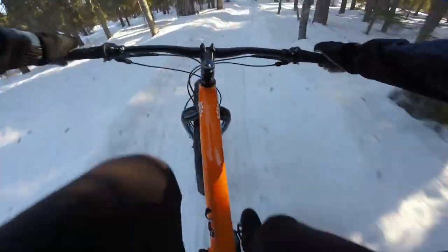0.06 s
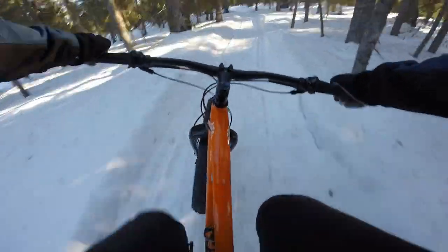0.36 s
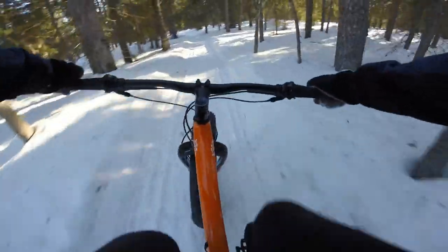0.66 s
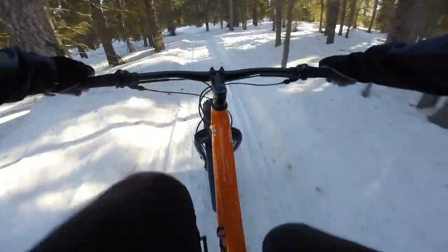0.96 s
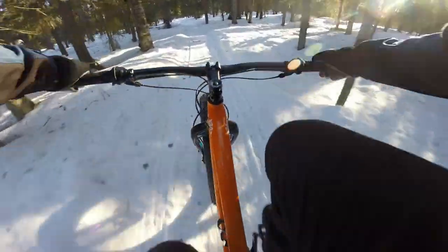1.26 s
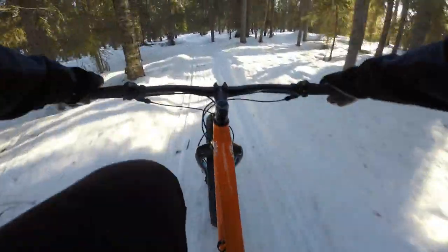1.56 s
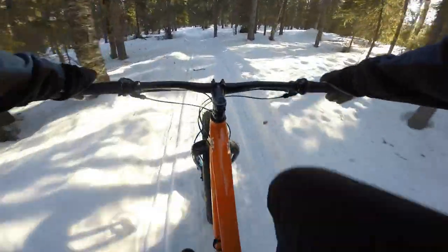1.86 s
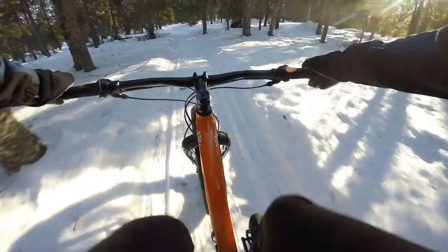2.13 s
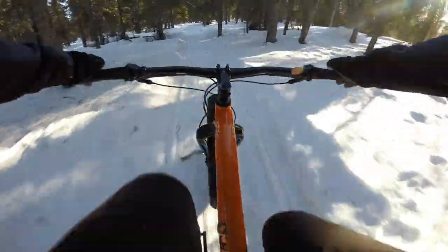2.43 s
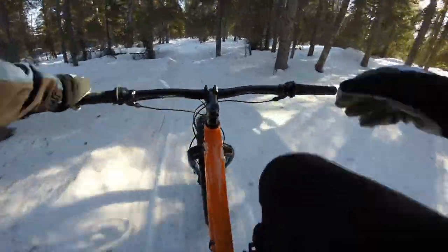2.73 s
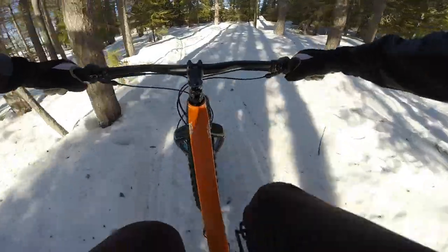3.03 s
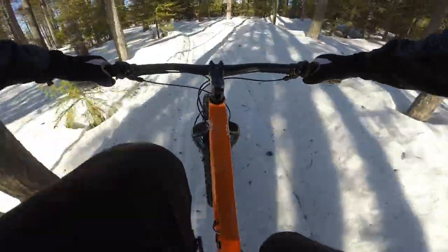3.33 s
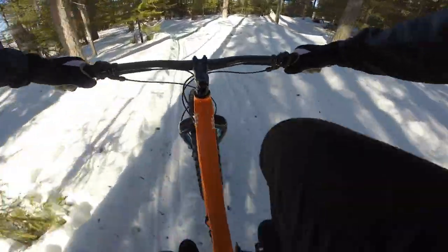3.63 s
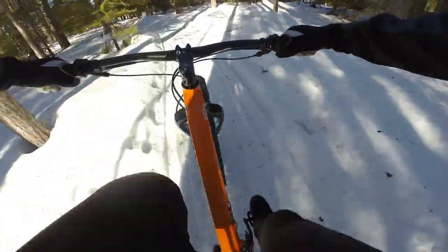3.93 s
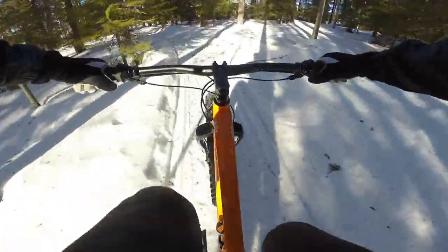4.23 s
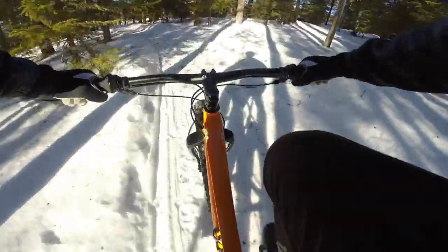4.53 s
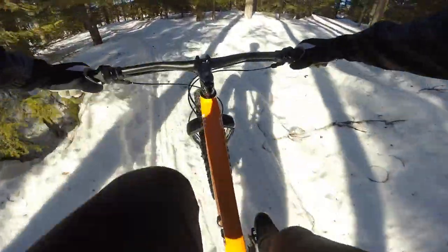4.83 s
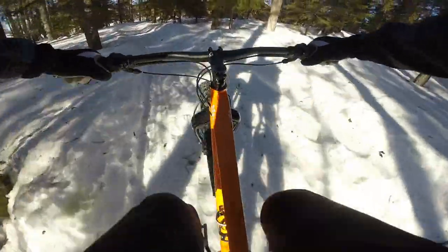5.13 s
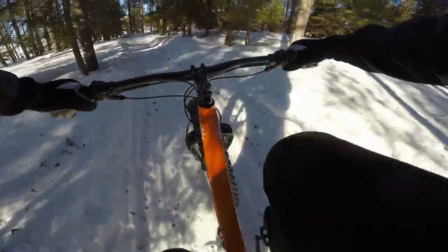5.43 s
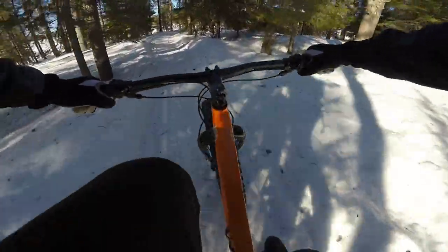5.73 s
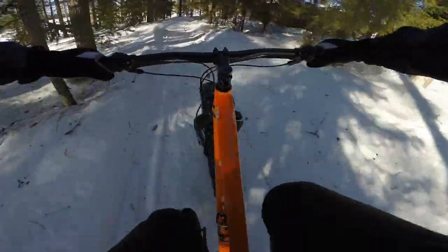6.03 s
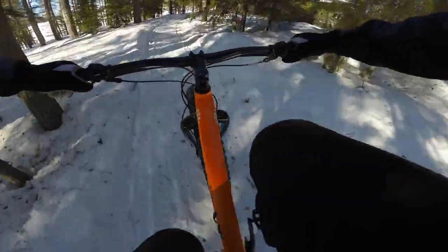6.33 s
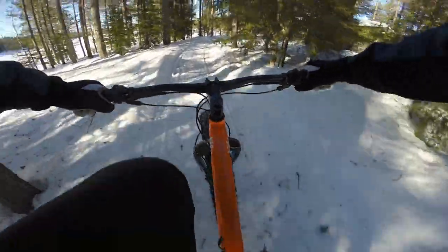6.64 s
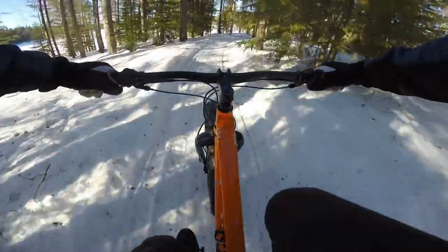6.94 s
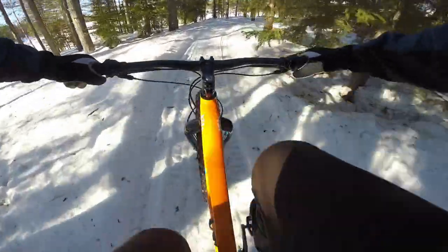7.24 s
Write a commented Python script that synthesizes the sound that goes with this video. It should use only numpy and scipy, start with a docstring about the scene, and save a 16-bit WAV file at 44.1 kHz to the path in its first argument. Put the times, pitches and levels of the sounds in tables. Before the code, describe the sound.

Low wind buffets a body-worn microphone outdoors while wide bicycle tyres crunch and hum steadily over snow. Pedalling adds soft, deep thumps nearly three times a second. Two loud, hollow knocks strike the microphone's housing about a second apart near the start, the second harder and brighter. After that the tyres keep rolling, swishing now and then, with faint jacket scuffs and tiny ticks from the bike.

```python
"""A fat bike rolls along packed snow, heard from a camera in a case on the rider's chest.
From the start the wide tyres hum and crunch over wind rumble, surging as the pedals are pushed;
each stroke shoves the camera with a soft thump. Something hard knocks loudly on the case at 0.65 s
and louder still at 1.7 s. The ride goes on, swishing through looser snow, with light knocks,
jacket scuffs and small ticks from the bike; a faint electronic whine lies under it all."""
import sys
import numpy as np
from scipy import signal
from scipy.fft import rfft, irfft, next_fast_len
from scipy.io import wavfile

SR = 44100
rng = np.random.default_rng(int(sys.argv[2]) if len(sys.argv) > 2 else 0)


def inscribe(sig):
    """Save sig as 16-bit PCM at rate SR to the path in sys.argv[1].

    A 1-D sig is mono; a 2-D sig holds one channel per row.
    Samples are clipped to [-1, 1] before scaling.
    """
    pcm = np.round(np.clip(np.atleast_2d(sig).T, -1, 1) * 32767)
    wavfile.write(sys.argv[1], SR, pcm.astype(np.int16))


N = 330289
T = np.arange(N) / SR


# Tone of the hollow roll, the crunch and the powder hiss. Each row: frequency in Hz, level in dB.
ROLL_EQ = [(70, -7.5), (150, 1.5), (230, -2.5), (310, 1), (380, -2), (490, -1.5), (640, -9), (900, -12.5),
           (1400, -40), (3000, -73)]
CRUNCH_EQ = [(400, -13.5), (900, -9), (1250, -5), (1490, -2), (1610, 3.5), (1710, 1.5), (1830, -6.5),
             (2080, -1.5), (2320, -1), (2620, -11.5), (2950, -9.5), (3400, -30.5), (5000, -42.5)]
POWDER_EQ = [(2000, -2.5), (3200, 7), (3900, 2), (4300, 7.5), (4650, 6), (5200, -5), (5700, 0.5),
             (6400, -2.5), (7300, -13), (8000, -13.5), (9900, -15), (12500, -23), (15000, -55)]
# Slow fades as snow and speed change. Each row: time in seconds, then crunch, roll and hiss gain in dB.
TYRE_FADERS = [(0.0, -50.5, -51.5, -63.5), (0.21, -44.9, -46, -58), (0.4, -46.5, -48, -58.5),
               (0.86, -47.5, -48, -61.5), (1.15, -50.5, -50.9, -61.5), (1.41, -54.5, -55.5, -69.5),
               (1.62, -49.5, -50, -63), (2.12, -50.1, -50, -64.5), (2.75, -51, -52, -63.5),
               (2.83, -58.5, -59, -72.5), (2.97, -48, -51, -62), (3.6, -51, -53.4, -62),
               (3.99, -50, -54, -64.5), (4.39, -50.5, -53.5, -62.9), (4.71, -49.5, -53.5, -64.5),
               (4.9, -49, -50.5, -60.7), (6.3, -49, -52.5, -62), (7.49, -50, -53, -63.3)]
# The tread ploughs through looser snow. Each row: centre in seconds, lift in dB, half-length in seconds.
LOOSE_SNOW = [(0.51, 4, 0.029), (1.309, 7.5, .045), (1.929, 5.5, 0.034), (2.889, 10, 0.048),
              (3.16, 5, 0.053), (3.557, 5.5, 0.059), (3.822, 7.5, 0.06), (4.15, 3.5, 0.043),
              (5.49, 1.5, .029), (6.063, 3, 0.013), (6.34, 1, 0.019), (6.675, 4, 0.057), (7.396, 3, 0.013)]

def tyres(push_db):
    """Snow crystals break in clumps and faintly ring the case; the air chamber hums, powder hisses."""
    swish_db = sum(db * bell(s, half) for s, db, half in LOOSE_SNOW)
    clumps, patches = wander(rate_hz=37), wander(rate_hz=11)
    breaks = grains(per_s=900, spread_db=2.0) + 0.97 * rng.standard_normal(N)
    ringing = unit(signal.oaconvolve(breaks, shell(T[:SR // 2]))[:N])
    crunch = colour(breaks, CRUNCH_EQ) + from_db(-23) * ringing
    crunch *= from_db(-2.5 + 1.26 * clumps + 0.63 * patches)
    roll = colour(rng.standard_normal(N), ROLL_EQ) * from_db(-2.5 + 2.0 * clumps + 0.88 * patches)
    powder = 0.5 * grains(per_s=3300, spread_db=2.5) + rng.standard_normal(N)
    hiss = colour(powder, POWDER_EQ) * from_db(-0.5 + 1.2 * clumps + 0.28 * patches)
    return (crunch * fader(TYRE_FADERS, column=1) * from_db(push_db + swish_db)
            + roll * fader(TYRE_FADERS, column=2) * from_db(push_db + 0.77 * swish_db)
            + hiss * fader(TYRE_FADERS, column=3) * from_db(push_db + swish_db))


# Pedal strokes, timed at the shove that ends each. Each row: time in seconds, shove level in dB,
# rocking rate in Hz, flutter in dB relative to the shove, tyre surge in dB.
PEDAL_STROKES = [(0.167, -27, 37.0, -16.5, 0.0), (0.565, -22, 24.6, -33, -1.8),
                 (0.983, -25.0, 27.0, -19, 1.5), (1.333, -26.5, 43, -18, 0.0),
                 (1.683, -31.5, 34.0, -9.0, 4.6), (2.107, -24.5, 34.5, -27.0, 0.0),
                 (2.497, -23.5, 44, -31, 2.6), (2.865, -33, 35.0, -11, 3), (3.18, -23, 28.0, -22.0, 1.1),
                 (3.565, -24.5, 35.8, -15, 2.7), (3.947, -22, 31.6, -18.5, 0.5), (4.305, -23.5, 36, -18, 5),
                 (4.658, -26.5, 37.5, -17.5, 5), (5.029, -23, 37.6, -13, 2.2),
                 (5.395, -22.5, 31.7, -21, 0.5), (5.761, -26.5, 40.3, -16, 1.1),
                 (6.128, -22, 37.6, -14.5, 1.4), (6.488, -22.5, 32.5, -19, 1.9),
                 (6.86, -25.5, 35.8, -20, 1.6), (7.221, -26.5, 37.0, -17, 2.5)]
# Trail bumps. Each row: time in seconds, jolt level in dB, rocking rate in Hz, relative flutter in dB.
TRAIL_BUMPS = [(0.246, -28.5, 55.3, 0), (.296, -21, 40, -11.5), (2.418, -21.5, 29.4, -12),
               (4.194, -20.5, 41.4, -9), (7.0, -40.5, 45, 1.5), (7.467, -25.5, 27.8, -29)]

def shoves():
    """Each stroke or bump rocks the camera through about one cycle and briefly flutters the harness."""
    rocking, flutter = np.zeros(N), np.zeros(N)
    for s, db, hz, flutter_db, *_ in PEDAL_STROKES + TRAIL_BUMPS:
        rocking += from_db(db) * np.sin(2 * np.pi * hz * (s - T)) * bell(s, half=0.44 / hz)
        flutter += from_db(db + flutter_db) * bell(s, half=0.014)
    harness_eq = [(30, -2.0), (70, 1.5), (110, 3.5), (180, -13.5), (350, -26.0), (900, -60), (3000, -78)]
    return rocking + flutter * colour(rng.standard_normal(N), harness_eq)


def pedalling():
    """How far the current stroke has gone (0-1), and the surge in dB that its push gives the tyres."""
    times, *_, surge_db = np.transpose(PEDAL_STROKES)
    strokes = np.interp(T, np.r_[0, times, N / SR], np.arange(len(times) + 2))
    phase = strokes % 1
    strength_db = np.r_[surge_db, surge_db.mean()].take(strokes.astype(int), mode="clip")
    return phase, strength_db * np.sin(np.pi * phase ** 1.26)  # the push peaks late in the stroke


# The tock of the case's small air cavity. Each row: frequency in Hz, level in dB.
TOCK_EQ = [(250, -57), (700, -27), (1150, -26), (1380, -21), (1470, -15), (1560, -1), (1620, 3),
           (1800, -4.5), (1980, -8), (2150, -7), (2400, -12), (2850, -25), (3020, -20.5), (3600, -42.5),
           (14000, -67)]
# Blows on the case. Each row: start in seconds, peak in dB, hardness as a treble shelf in dB,
# gain of the shell's ring in dB.
CASE_KNOCKS = [(0.012, -37, 0, -11), (0.2936, -33, 12, 10), (0.6481, -8.5, -22, -6), (.7858, -33, 0, -6),
               (0.8013, -28, -6, -6), (1.6933, 1.5, -1.5, -1), (2.3920, -40, -5, -6),
               (2.394, -31.5, -10, -6), (4.3756, -34.5, -14, -8), (4.957, -32.5, -8, -4),
               (5.1, -36.5, -10, -6), (5.117, -38, -7, -6), (6.92, -37.5, -6, -6)]

def knocks():
    """A hard blow rings the case: a strong short tock from the cavity, a thin ping from the shell."""
    out, t = np.zeros(N), np.arange(SR // 2) / SR
    bins = np.fft.rfftfreq(2 * len(t), 1 / SR)
    tock = impulse_response(eq_gain(bins, TOCK_EQ), size=len(t))
    contact = 1 - np.exp(-(t / 0.00066) ** 2)  # the ring builds while the two parts touch
    ping = contact * shell(t)
    shelf = 1 / (1 + (2200 / (bins + 1)) ** 16)  # opens above 2.2 kHz
    for s, peak_db, hard_db, ring_db in CASE_KNOCKS:
        ring = tock / abs(tock).max() + from_db(ring_db) * ping
        blow = signal.fftconvolve(ring, impulse_response(from_db(hard_db * shelf), size=512))
        add(out, s, from_db(peak_db) * blow / abs(blow).max())
    return out


# The shell's resonances. Each row: pitch in Hz, relative level in dB, seconds to fall by 60 dB.
SHELL_MODES = [(1847, -28.5, 0.27), (2320, -39, 0.075), (2370, -34, 0.092), (2710, -35, 0.089),
               (2820, -36, 0.097), (3830, -24.5, 0.0097), (5100, -33, 0.0099), (6150, -36, .008),
               (7340, -11, 0.0032), (9250, -51, .003), (10950, -50, .003), (12800, -48, .003),
               (14700, -55, 0.0034)]

def shell(t):
    """The case's shell rings in decaying partials, t seconds after a tap."""
    return sum(from_db(db - 60 * t / t60) * np.sin(2 * np.pi * hz * t) for hz, db, t60 in SHELL_MODES)


# Tone of the wind rumble. Each row: frequency in Hz, level in dB.
WIND_EQ = [(8, -4), (24, 1.5), (35, -2.5), (50, -19.5), (75, -15), (110, -19), (170, -31.5), (300, -54),
           (800, -83)]
# The wind's slow rise and fall. Each row: time in seconds, gain in dB.
WIND_FADER = [(0.0, -39.5), (0.3, -33.5), (0.72, -32.2), (1.05, -37.5), (1.25, -31.5), (1.45, -36.7),
              (1.7, -32.5), (1.9, -39.5), (2.1, -31), (2.25, -34), (2.4, -31), (2.75, -33), (3.35, -32.5),
              (3.72, -37), (4.0, -36.5), (4.9, -36.5), (5.55, -37), (6.3, -34.5), (6.7, -37), (7.49, -35.5)]

def wind(phase):
    """Air rumbles on the camera, easing after each stroke and building again as the rider sways."""
    sway_db = -2 * np.cos(2 * np.pi * (phase - 0.3))  # calmest 30% into the stroke
    rumble = colour(rng.standard_normal(N), WIND_EQ) * fader(WIND_FADER, column=1)
    return rumble * from_db(-2.2 + sway_db + 2.0 * wander(rate_hz=9.9))


# Ruts under the tyres. Each row: centre in seconds, level in dB, half-length in seconds.
RUT_HITS = [(0.238, -47, 0.014), (0.504, -47, 0.035), (0.781, -46, 0.016), (0.955, -50, 0.014),
            (2.005, -50, .012), (2.405, -44.5, 0.036), (2.585, -52, 0.053), (2.7, -44, 0.022),
            (3.8, -51, 0.031), (4.19, -43.5, 0.029), (5.898, -48, .018), (6.706, -42.5, 0.01)]
# Tone of the boom. Each row: frequency in Hz, level in dB.
BOOM_EQ = [(70, -9), (150, 11), (220, 5), (310, 6.5), (420, -3), (700, -8.5), (2000, -59)]

def ruts():
    """Ruts drum short hollow booms out of the tyre's air chamber."""
    load = sum(from_db(db) * bell(s, half) for s, db, half in RUT_HITS)
    return load * colour(rng.standard_normal(N), BOOM_EQ)


# Jacket rubs. Each row: centre in seconds, level in dB, half-length in seconds.
JACKET_RUBS = [(0.249, -46.5, 0.012), (0.352, -44.5, 0.0055), (0.486, -47, 0.0033), (0.8, -49.5, 0.006),
               (0.949, -48.5, 0.011), (0.985, -55, 0.0091), (2.414, -47, 0.0098), (4.189, -48.5, 0.0085),
               (4.219, -51, 0.01)]
# Tone of the cloth. Each row: frequency in Hz, level in dB.
CLOTH_EQ = [(600, -36), (1300, -43), (1900, 9), (2350, 4.5), (2700, -5), (3700, -2), (4800, -13),
            (6000, -8), (7500, -8.5), (8200, -24), (15000, -29)]

def scuffs():
    """The stiff jacket brushes the case in short grainy rubs."""
    pressure = sum(from_db(db) * bell(s, half) for s, db, half in JACKET_RUBS)
    return pressure * colour(grains(per_s=11000, spread_db=5.5), CLOTH_EQ)


# Small dry ticks. Each row: start in seconds, peak in dB, band centre in Hz.
BIKE_TICKS = [(0.2927, -35.5, 3860), (0.2937, -28.5, 2290), (.2935, -47, 13500), (0.648, -43, 5330),
              (0.649, -44, 6300), (3.625, -54, 6800), (3.825, -56, 13000), (4.1712, -52, 10000),
              (4.2118, -58, 9000), (4.776, -50, 7150), (5.108, -57, 13500), (5.4405, -54, 12500),
              (5.441, -50, 7200), (5.4885, -44, 5500), (5.9545, -53, 7200), (6.06, -56, 12500),
              (6.6895, -52, 9000), (7.2992, -47, 7200)]

def ticks():
    """Tiny hard contacts in the bike and camera mount, each a few milliseconds of bright noise."""
    out, t = np.zeros(N), np.arange(SR // 50) / SR
    for s, db, hz in BIKE_TICKS:
        band = signal.butter(2, [hz / 1.17, hz * 1.17], "bandpass", fs=SR)
        tick = signal.lfilter(*band, rng.standard_normal(len(t)) * np.exp(-t / 0.0017))
        add(out, s, from_db(db) * tick / abs(tick).max())
    return out


# Thin high tones. Each row: pitch in Hz, rms level in dB, waver in Hz.
WHINE_TONES = [(5844, -83, 5), (8781, -80, 6), (11705, -93, 12), (14626, -94, 8)]
# A looping triple chirp. Each entry: time in seconds within the loop.
CHIRP_TIMES = [.278, .318, .337]

def whine(loop_s=0.3862, chirp_hz=5520):
    """The camera's electronics give off faint wavering tones and tiny chirps over a steady hiss."""
    tones = np.zeros(N)
    for hz, db, waver in WHINE_TONES:
        pitch = hz + waver * wander(rate_hz=22)
        tones += np.sqrt(2) * from_db(db) * np.sin(2 * np.pi * np.cumsum(pitch) / SR)
    gate = sum(np.exp(-((T % loop_s - s) / 0.0021) ** 2) for s in CHIRP_TIMES)
    chirps = from_db(-62) * gate * np.sin(2 * np.pi * chirp_hz * T)
    hiss = colour(rng.standard_normal(N), [(1000, -2.5), (10000, 1), (13000, -4.5)])
    return tones + chirps + from_db(-73.5) * hiss


def from_db(db):
    """Decibels to gain."""
    return 10 ** (np.asarray(db) / 20)


def unit(x):
    """Scales to rms 1."""
    return x / np.sqrt(np.mean(x ** 2) + 1e-20)


def fader(rows, column):
    """One dB column of a timed curve as a gain at every sample."""
    rows = np.array(rows)
    return from_db(np.interp(T, rows[:, 0], rows[:, column]))


def eq_gain(bins, eq):
    """The gain of an EQ curve at the frequencies in bins."""
    hz, db = np.transpose(eq)
    return from_db(np.interp(np.log(bins + 1), np.log(hz), db))


def colour(x, eq):
    """Plays x through an EQ curve, at rms 1."""
    size = next_fast_len(N)
    gain = eq_gain(np.fft.rfftfreq(size, 1 / SR), eq)
    return unit(irfft(rfft(x, size) * gain, size)[:N])


def wander(rate_hz):
    """Smooth random drift of rms 1, moving about rate_hz times a second."""
    size = next_fast_len(N)
    lowpass = np.exp(-(np.fft.rfftfreq(size, 1 / SR) / rate_hz) ** 2)
    return unit(irfft(rfft(rng.standard_normal(N), size) * lowpass, size)[:N])


def grains(per_s, spread_db):
    """Sparse clicks of random sign, mostly small and a few large."""
    size = from_db(spread_db * np.minimum(rng.exponential(1, N), 4))
    return unit(size * rng.choice([-1, 1], N) * (rng.random(N) < per_s / SR))


def bell(s, half):
    """A smooth swell of height 1 around time s."""
    return np.exp(-np.minimum(((T - s) / half) ** 2 / 2, 20))


def add(mix, s, sound):
    """Mixes a sound in at time s."""
    part = mix[max(round(s * SR), 0):][:len(sound)]
    part += sound[:len(part)]


def impulse_response(gain, size):
    """The tightest (minimum-phase) impulse response with this gain at each frequency."""
    log_gain = np.log(np.maximum(np.r_[gain, gain[-2:0:-1]], 1e-5))
    return np.fft.ifft(np.exp(np.conj(signal.hilbert(log_gain)))).real[:size]


def scene():
    """The pedalling drives tyres and wind; all reaches one microphone, and open snow gives no echo."""
    phase, push_db = pedalling()
    return (tyres(push_db) + ruts() + wind(phase) + shoves()
            + knocks() + scuffs() + ticks() + whine())[None]


def record(dry):
    """Clips the hardest knock at full scale, then cuts the treble above about 15 kHz."""
    lowpass = signal.firwin(401, 14950, window=("kaiser", 8), fs=SR)
    return signal.oaconvolve(np.clip(dry, -1, 1), lowpass[None], "same")


dry = scene()
out = record(dry)
inscribe(out)
```